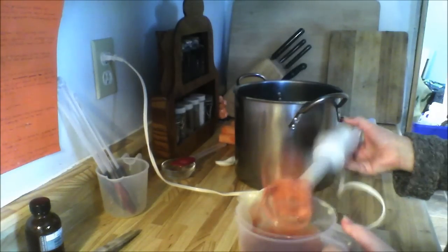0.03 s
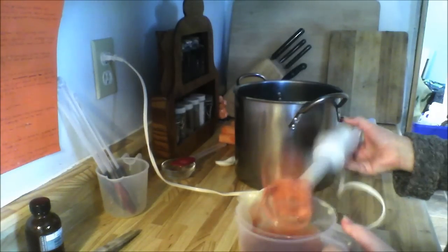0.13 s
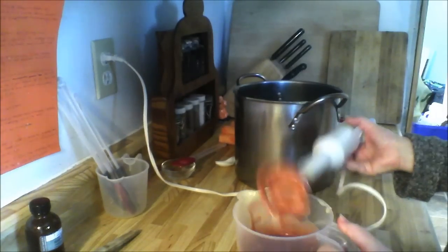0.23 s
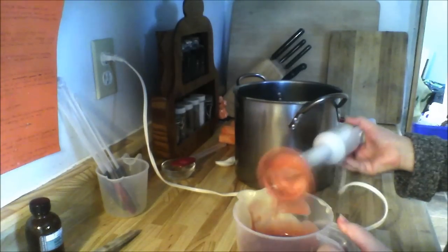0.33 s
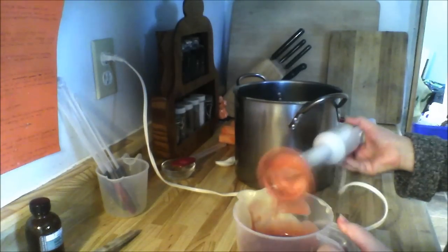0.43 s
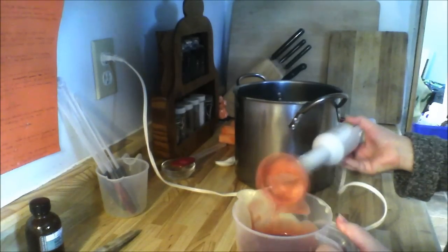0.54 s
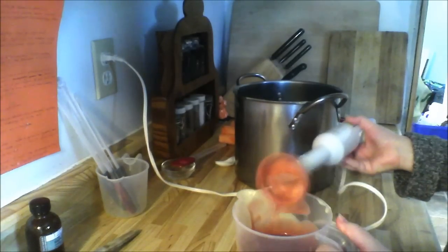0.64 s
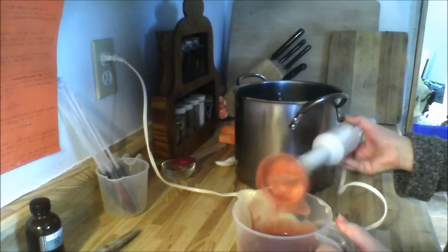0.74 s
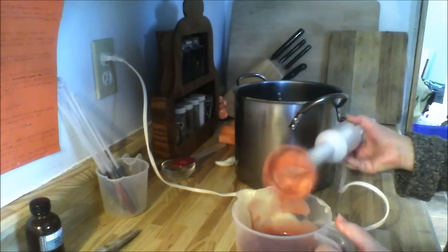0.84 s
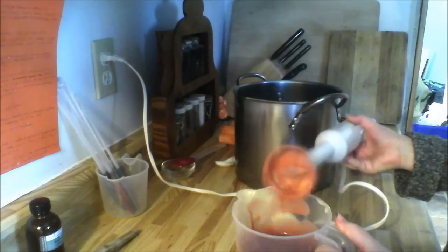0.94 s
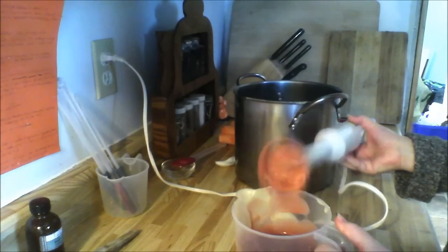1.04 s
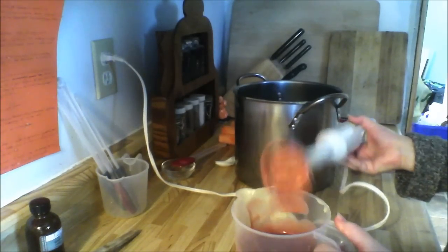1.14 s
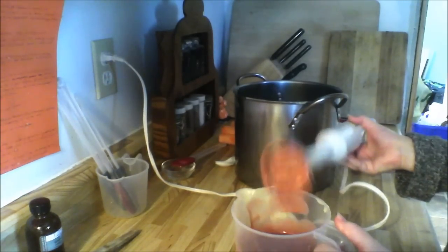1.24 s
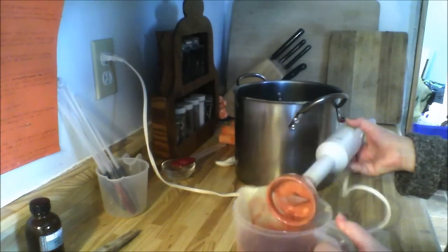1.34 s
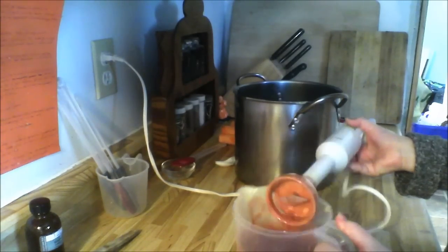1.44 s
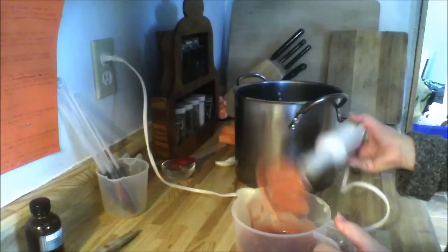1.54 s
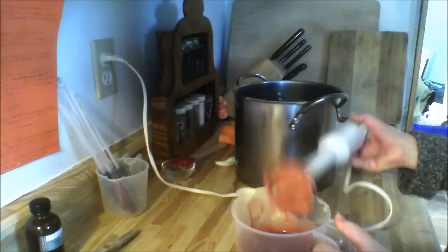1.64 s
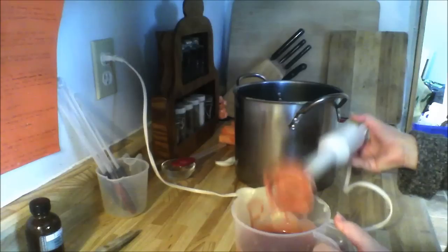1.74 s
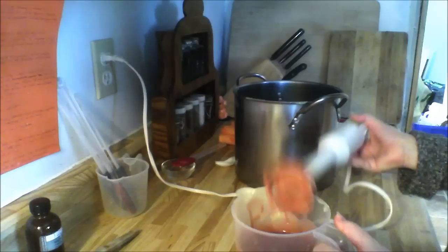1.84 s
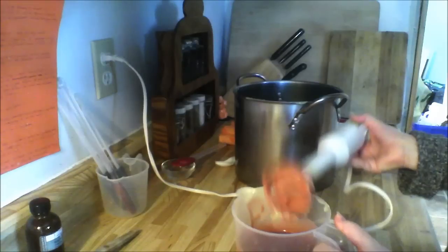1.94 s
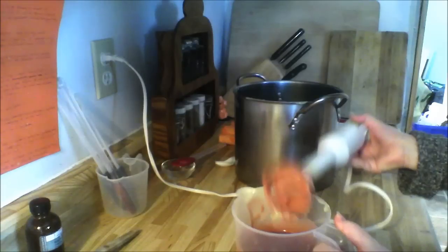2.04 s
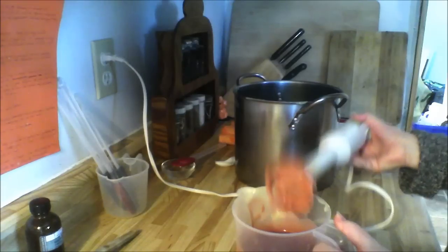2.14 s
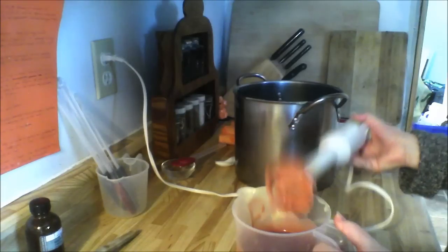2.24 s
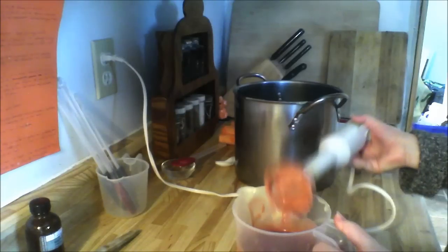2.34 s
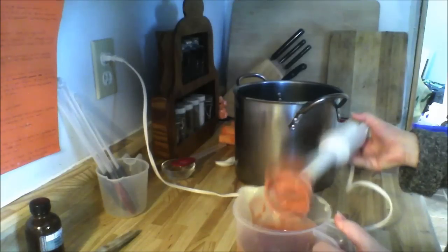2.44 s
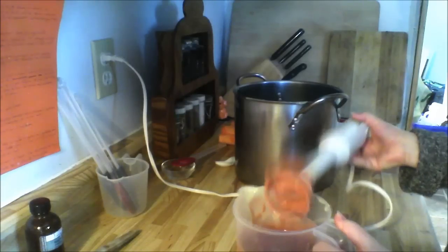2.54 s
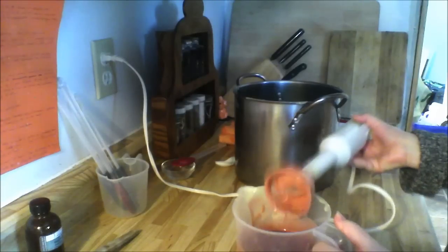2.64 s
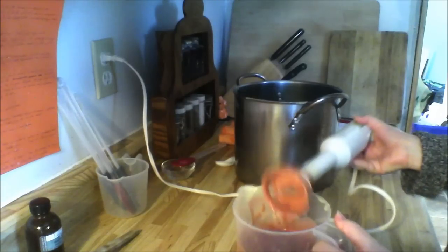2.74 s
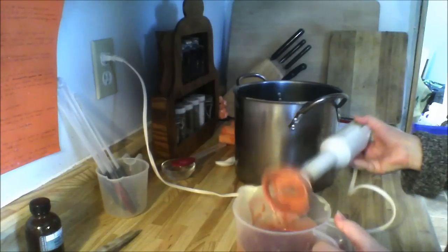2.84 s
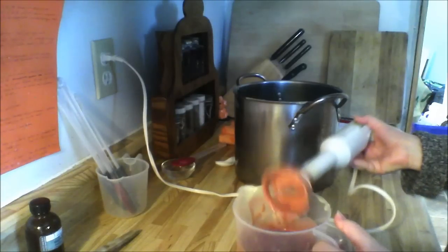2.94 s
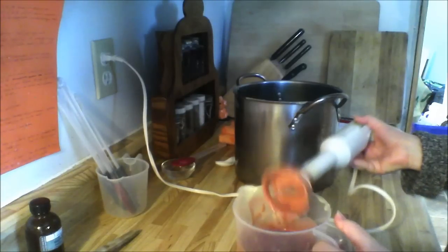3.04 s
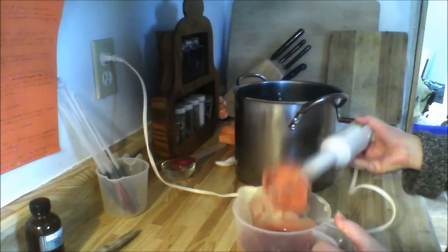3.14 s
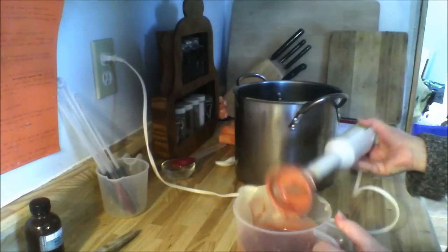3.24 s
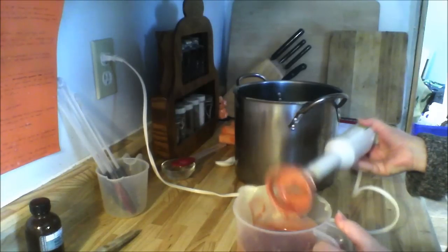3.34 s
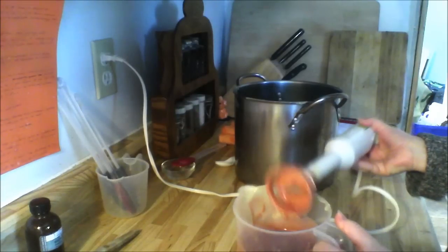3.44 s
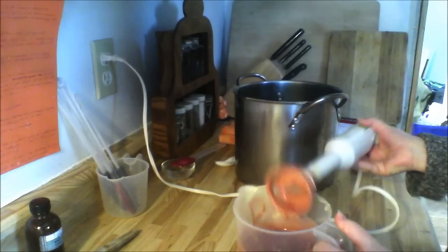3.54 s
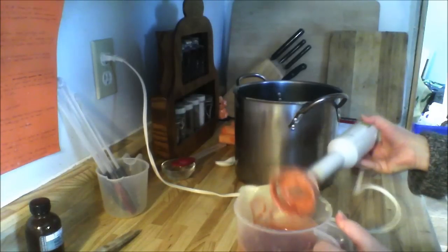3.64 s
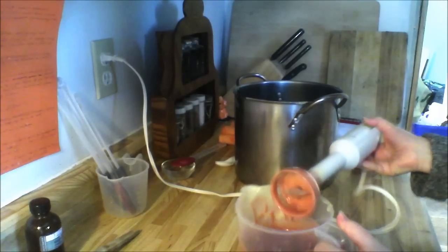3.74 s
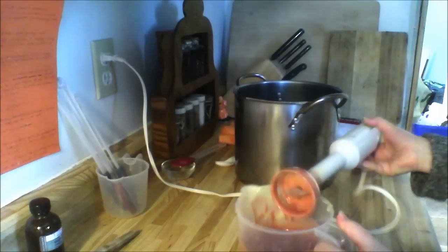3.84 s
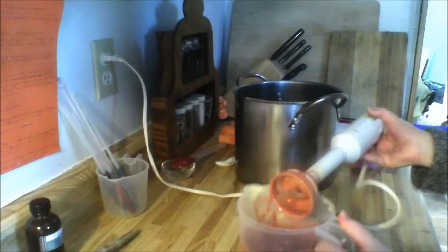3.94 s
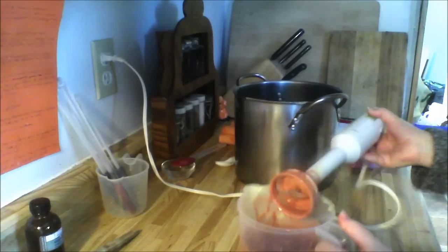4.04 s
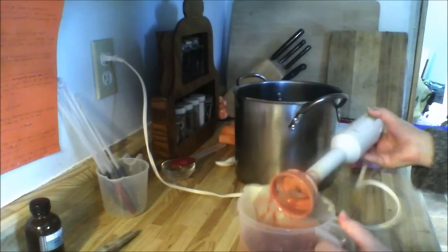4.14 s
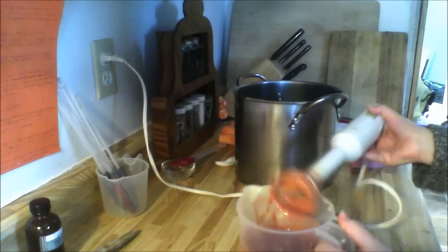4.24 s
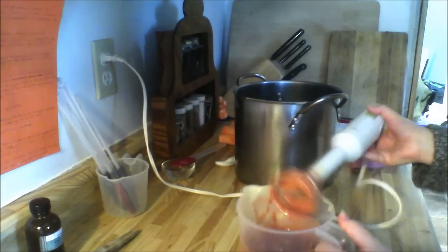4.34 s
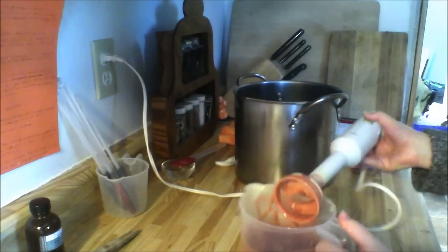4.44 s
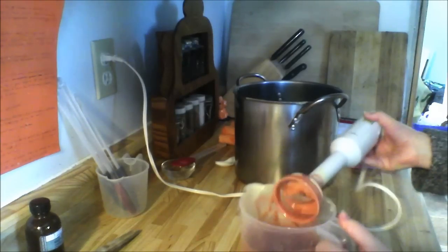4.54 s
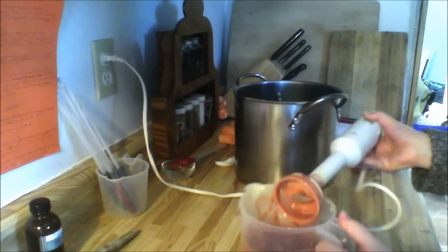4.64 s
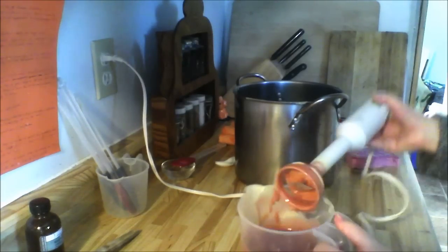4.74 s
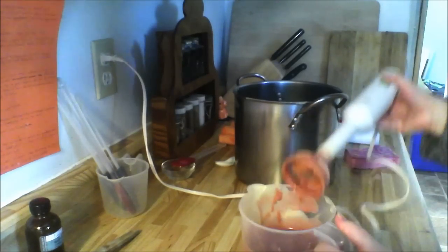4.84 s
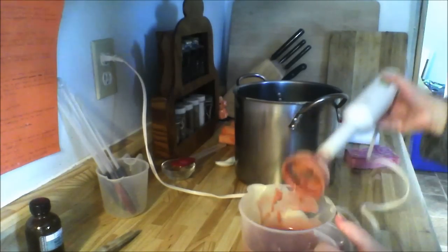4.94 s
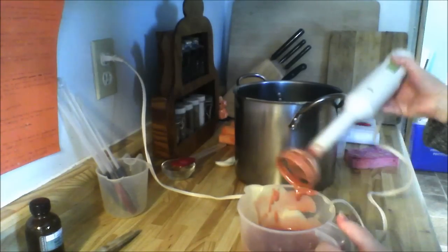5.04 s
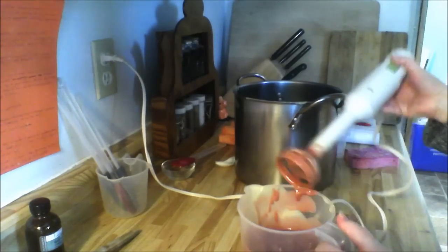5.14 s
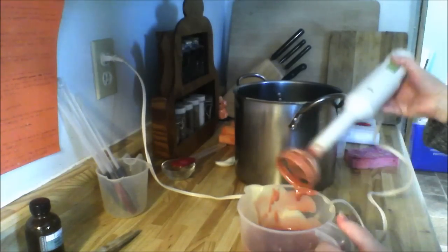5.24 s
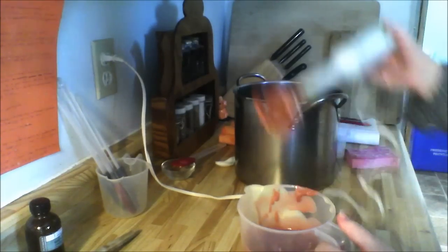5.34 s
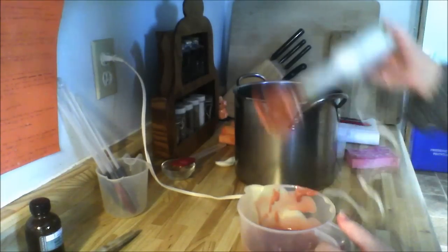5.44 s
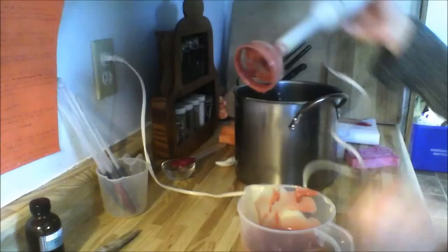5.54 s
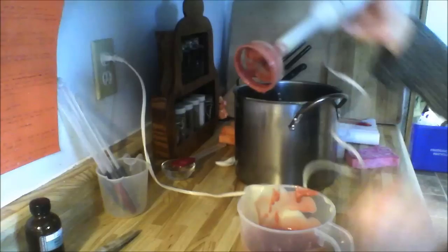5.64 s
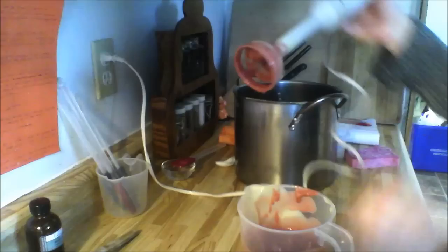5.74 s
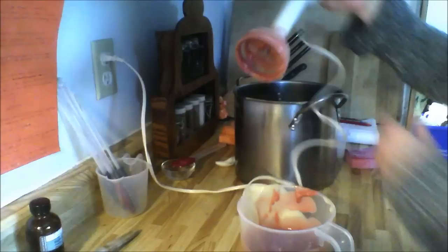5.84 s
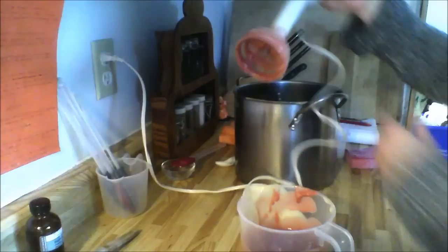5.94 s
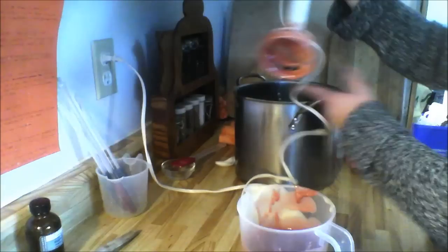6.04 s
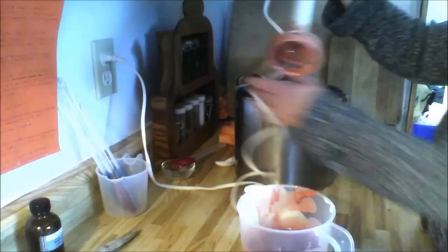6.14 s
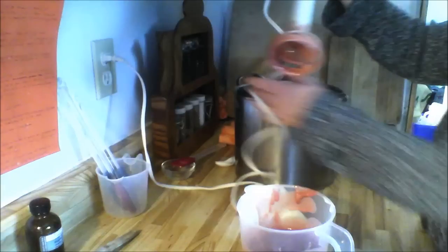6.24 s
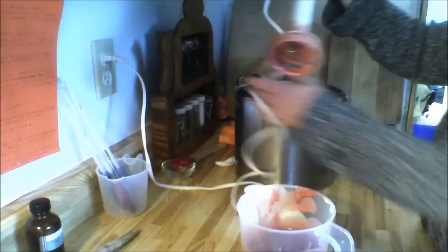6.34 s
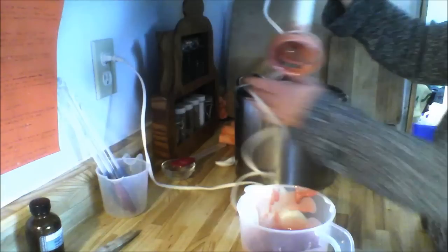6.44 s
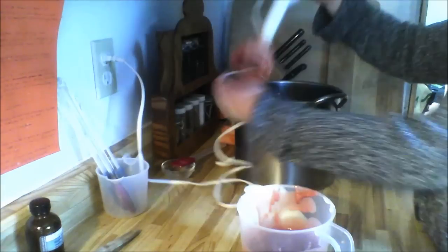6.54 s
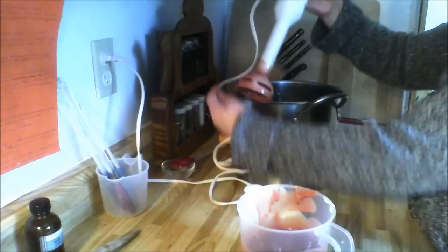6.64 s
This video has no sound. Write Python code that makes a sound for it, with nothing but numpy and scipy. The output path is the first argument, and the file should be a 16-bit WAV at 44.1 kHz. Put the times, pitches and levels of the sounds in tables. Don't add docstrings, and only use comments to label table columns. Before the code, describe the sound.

From 0 to about 4.5 seconds, a stick blender with its motor off is rapped on the rim of a plastic pitcher holding thick batter. Blows come every 0.23 to 0.25 seconds, uneven in strength, each a dry broadband crack with a short hollow ring around 130 to 400 hertz and a softer rebound about 0.05 seconds later. Around 3.3 to 3.8 seconds the rebounds thump the pitcher heavily on the bench. The last blow at 4.4 has two quick bounces. Then it falls nearly silent: small scuffs with light taps at 4.9 and 5.17, a clearer knock and brushing around 5.75, then soft cord and sleeve rubbing with faint ticks from 6.2 to 6.6. A pot hums almost inaudibly. Small room, short tails, close thin microphone with flattened peaks, dull treble and very low gated hiss.

```python
import sys
import numpy as np
from scipy import signal
from scipy.fft import rfft, irfft, next_fast_len
from scipy.io import wavfile
from scipy.ndimage import uniform_filter1d, map_coordinates

SR = 44100
rng = np.random.default_rng(int(sys.argv[2]) if len(sys.argv) > 2 else 0)


def output_pcm(signal):
    pcm = np.clip(np.atleast_2d(signal).T, -1, 1) * 32767
    wavfile.write(sys.argv[1], SR, np.round(pcm).astype(np.int16))


def invert_db(level):
    return 10 ** (np.asarray(level, dtype=float) / 20)


N = 295690
LEAD, RING = SR // 10, 12288


def unit(x):
    return x / np.sqrt(np.mean(x ** 2) + 1e-20)


def along(points, hz):
    f, v = np.transpose(points)
    return np.interp(np.log(hz + 1), np.log(f + 1), v)


def noise(spectrum, size):
    m = next_fast_len(size + 8192)
    white = rfft(rng.standard_normal(m))
    colour = invert_db(along(spectrum, np.fft.rfftfreq(m, 1 / SR)))
    return unit(irfft(white * colour, m)[:size])


def ring(modes, attack, scatter_db, phase, detune):
    hz, db, t60 = np.transpose(modes)[:, :, None]
    t = np.arange(RING) / SR
    strength, shift = rng.standard_normal((2, len(modes), 1))
    decay = invert_db(db + scatter_db * strength - 60 * t / t60)
    each = decay * np.sin(2 * np.pi * hz * (1 + detune * shift) * t + phase)
    return each.sum(0) * (1 - np.exp(-t / attack))


# frequency in Hz, t60 in seconds.
ROOM_DECAY = [(150, 0.24), (400, 0.26), (900, 0.3), (2000, 0.25), (4000, 0.22), (6000, 0.2), (8000, 0.17)]


def room(x, wet_db, size):
    burst = x[:1024] * np.exp(-np.arange(1024) / SR / 0.031)
    colour = np.sqrt(np.abs(uniform_filter1d(np.abs(rfft(burst)) ** 2, size)))
    hz, t, z = signal.stft(rng.standard_normal(RING), SR, nperseg=1024)
    decay = invert_db(-60 * t / along(ROOM_DECAY, hz)[:, None])
    tail = signal.istft(z * colour[:, None] * decay, SR, nperseg=1024)[1][:RING]
    tail = tail * (1 - np.exp(-np.arange(RING) / SR / 0.01))
    return x + invert_db(wet_db) * tail * np.linalg.norm(burst) / np.linalg.norm(tail)


# frequency in Hz, level in dB, t60 in seconds.
UPPER_MODES = [(547.8, -1.5, 0.048), (603.2, -0.5, 0.049), (766.5, 0, 0.05), (834, -2, 0.07),
               (882, -2.5, 0.027), (1021.5, -7, 0.05), (1122.5, -3, 0.052), (1223, -8.5, 0.05),
               (1560, -15, 0.05), (1700, -11, 0.061), (2000, -12, 0.04), (2357, -9.5, .035),
               (2790, -14, .035), (3405, -10.5, 0.044)]


def contacts(rows, spectrum, base, second, low_db, second_db, upper_db, crack_db, crack_rise, crack_t60,
             wet_db, low_wet_db):
    out, t = np.zeros(LEAD + N + RING), np.arange(RING) / SR
    for s, db, low, mid, top, hard in rows:
        colour = [(hz, level + hard * np.log2(max(hz / 2500, 1))) for hz, level in spectrum]
        crack = noise(colour, RING) * invert_db(crack_db - 60 * t / crack_t60) * (1 - np.exp(-t / crack_rise))
        crack += invert_db(top + upper_db) * ring(UPPER_MODES, attack=0.003, scatter_db=1.55, phase=0, detune=0.013)
        body = invert_db(low + low_db) * ring(base, attack=0.004, scatter_db=3.5, phase=np.pi, detune=0.0042)
        body += invert_db(mid + second_db) * ring(second, attack=0.0057, scatter_db=2.5, phase=np.pi / 4,
                                            detune=0.0037)
        contact = room(crack, wet_db, size=5) + room(body, low_wet_db, size=1)
        out[LEAD + round(s * SR):][:RING] += invert_db(db) * contact
    return out[LEAD:LEAD + N]


# frequency in Hz, density in dB per Hz.
RIM_CRACK = [(530, -22.5), (900, -2.5), (1220, -10), (1470, -13.5), (1800, -8.5), (2270, -9.5),
             (2870, -12.5), (3330, -10.5), (4420, -19), (6550, -20.5), (10000, -42.5), (13000, -86),
             (22000, -120)]
# frequency in Hz, level in dB, t60 in seconds.
PITCHER_LOW = [(131.8, -11, 0.097), (186.3, 3.5, 0.056), (186.8, -16.5, 0.25), (209, -27.5, 0.19),
               (248, -8, 0.11)]
# frequency in Hz, level in dB, t60 in seconds.
PITCHER_SECOND = [(368.5, 1.5, 0.099), (351.5, -19, 0.26), (373.7, -11, 0.24), (470, -7, 0.09)]
# start in seconds, crack in dB, ring in dB, hardness in dB per octave.
BLOWS = [(-.06, -7, -10.5, 2.5), (0.181, -1.5, -7, -3), (0.4278, -5, -8.5, -1.5), (0.6636, -6, -8.5, -3.5),
         (0.9042, -9.5, -9.5, 2), (1.1441, -2, -8.5, -0.6), (1.3847, -1.5, -7, 0.3), (1.6251, -3, -10, -3),
         (1.8642, -3.5, -9, -2), (2.0886, -5.5, -9.5, -1), (2.3361, -5.5, -11, -0.5),
         (2.565, -6.5, -8.5, 0.5), (2.803, -4.5, -9.5, 1), (3.0326, -10.5, -19.5, -1.2),
         (3.2612, -4, -9.5, 0), (3.5112, -3, -13, -2.3), (3.743, -3.5, -8, -2.1), (3.9767, -4.5, -9, -0.8),
         (4.2, -8, -14, -1), (4.404, -3.5, -10, 0.6)]


def blows():
    cleaner_db_per_s = 0.85
    rows = []
    for s, db, ring_db, hard in BLOWS:
        upper_db = -1 + 0.7 * (ring_db + 10.5) + cleaner_db_per_s * (s - 2)
        rows.append((s, db, ring_db - db, ring_db + 1.5 - db, upper_db - db, hard))
    return contacts(rows, RIM_CRACK, PITCHER_LOW, PITCHER_SECOND, low_db=3, second_db=1.5, upper_db=-4.5,
                    crack_db=-3.5, crack_rise=0.00059, crack_t60=0.048, wet_db=-7.5, low_wet_db=-8.5)


# frequency in Hz, level in dB, t60 in seconds.
BASE_THUD = [(133, -12, .08), (178, -2, 0.065), (203, 0, .07), (186.9, -16.5, .3), (250, -2, 0.036),
             (320, -13, 0.052)]
# start in seconds, crack in dB, thud in dB, wall modes in dB.
BOUNCES = [(-.015, -27.5, -32, -28), (0.226, -17, -15, -15), (0.4753, -14.5, -15, -17.5),
           (0.707, -17.5, -16, -25.5), (0.9524, -15, -17, -33.5), (1.1939, -18, -13.5, -19),
           (1.4396, -14, -12, -18), (1.6704, -15, -13, -19.5), (1.914, -12.5, -14.5, -22.5),
           (2.135, -16.5, -15, -16), (2.383, -16, -14.5, -32.5), (2.608, -18.5, -24, -24.5),
           (2.8529, -16.5, -18, -24), (3.0631, -29.5, -16, -39.5), (3.3086, -9.5, -2.5, -23),
           (3.5565, -7.5, -4, -20), (3.7901, -7.5, -1.5, -17), (4.0319, -10.5, -16.5, -16),
           (4.2388, -16.5, -14.5, -25), (4.4461, -16, -32, -20), (4.4807, -10, -10.5, -23.5)]


def bounces():
    rows = [(s, db, thud_db - db, wall_db - db, -1, -3.5) for s, db, thud_db, wall_db in BOUNCES]
    return contacts(rows, RIM_CRACK, BASE_THUD, PITCHER_SECOND, low_db=3.0, second_db=2.0, upper_db=-6.5,
                    crack_db=-2.5, crack_rise=0.00092, crack_t60=0.049, wet_db=-7.5, low_wet_db=-11)


# frequency in Hz, density in dB per Hz.
HISS_COLOUR = [(35, -94), (60, -41.5), (168, -4), (388, -11), (440, -1.5), (712, -16), (1110, -8.5),
               (1230, -12), (2610, -19.5), (6300, -32.5), (9000, -35), (11700, -78.5), (19800, -120)]
# time in seconds, level in dB.
HISS_LEVEL = [
    (4.7, -67.5),
    (5.048, -72),
    (5.24, -73.5),
    (5.61, -68),
    (6.15, -70),
    (6.39, -68),
    (6.57, -69),
    (6.7, -71),
]


def floor():
    return noise(HISS_COLOUR, N) * invert_db(np.interp(np.arange(N) / SR, *np.transpose(HISS_LEVEL)))


# frequency in Hz, level in dB, t60 in seconds.
POT_MODES = [(888, -69, 5)]


def pot():
    push, t = np.zeros(N), np.arange(2 * SR) / SR
    for s, db, *_ in BLOWS[1:] + BOUNCES[1:]:
        push[round(s * SR)] = invert_db(db)
    hum = sum(invert_db(db - 60 * t / t60) * np.sin(2 * np.pi * hz * t) for hz, db, t60 in POT_MODES)
    return signal.fftconvolve(push, hum)[:N]


def resonate(x, hz, width_hz):
    return unit(signal.lfilter(*signal.iirpeak(hz, hz / width_hz, SR), x))


def strokes(rows, friction, width):
    out = np.zeros(N)
    for s, rise, fall, db, hz in rows:
        on = np.arange(round((s - rise) * SR), round((s + fall) * SR))
        away = np.interp(on / SR, [s - rise, s, s + fall], [1, 0, 1])
        out[on] += resonate(friction[on], hz, width * hz) * invert_db(db - 36 * away ** 1.5)
    return out


# frequency in Hz, density in dB per Hz.
DRAG_COLOUR = [(90, -29.5), (140, 2), (700, -0.5), (1000, -30)]
# frequency in Hz, density in dB per Hz.
RUB_COLOUR = [(400, -14.5), (700, -2), (3500, -7), (4800, -21.5), (7000, -47.5)]
# peak in seconds, rise in seconds, fall in seconds, level in dB, centre in Hz.
DRAGS = [(1.085, .07, 0.42, -60.5, 301.6), (4.897, 0.018, 0.084, -42.5, 190),
         (5.172, 0.018, 0.08, -41.5, 320), (5.4, .03, .08, -65, 160), (5.445, 0.089, .035, -51, 176),
         (5.42, 0.11, 0.15, -65, 447), (5.735, 0.016, 0.071, -55, 427), (5.81, 0.069, 0.06, -47, 427),
         (6.066, .06, 0.03, -75, 437), (6.126, .07, .12, -74, 440), (6.36, .025, .12, -55, 186),
         (6.386, .07, .1, -44.5, 420), (6.46, .1, .06, -47, 330), (6.55, 0.044, 0.03, -48, 416)]
# peak in seconds, rise in seconds, fall in seconds, level in dB, centre in Hz.
RUBS = [(1.082, 0.054, 0.3, -53.5, 1410), (4.893, 0.017, .1, -49, 2480), (5.171, .016, 0.063, -49, 2500),
        (5.766, 0.048, 0.039, -41, 2000), (6.19, .1, .03, -67.5, 1640), (6.326, 0.026, 0.12, -51, 1430),
        (6.385, 0.078, 0.12, -51, 1420), (6.46, 0.11, 0.094, -56.5, 1410),
        (6.523, 0.005, 0.059, -43.5, 1270)]
# peak in seconds, rise in seconds, fall in seconds, level in dB, centre in Hz.
BRUSHES = [(4.9, 0.011, 0.094, -52, 2030), (5.42, 0.092, 0.1, -61.5, 880), (5.785, 0.024, .12, -53, 1050),
           (5.79, 0.036, 0.11, -50, 1680), (6.1, .1, 0.13, -71, 453)]


def scuffs():
    catches = map_coordinates(rng.standard_normal(1000), [np.arange(N) / SR * 110])
    drag = noise(DRAG_COLOUR, N)
    rub = unit(invert_db(4.5 * catches) * noise(RUB_COLOUR, N))
    return strokes(DRAGS, drag, width=0.3) + strokes(RUBS, rub, width=0.51) + strokes(BRUSHES, rub, width=0.065)


# frequency in Hz, density in dB per Hz.
KNOCK_CRACK = [(410, -47), (700, -48), (1040, 3), (1490, -11.5), (1660, -2.5), (2320, -5), (3060, -16),
               (3670, -9), (6330, -18.5), (9000, -48), (11700, -91), (19800, -120)]
# frequency in Hz, level in dB, t60 in seconds.
HANDLE_MODES = [(272, -4.5, 0.062), (432, 16.5, 0.024), (504, -8.5, 0.054)]
# start in seconds, crack in dB, low modes in dB over it,
# handle modes in dB over it, hardness in dB per octave.
KNOCKS = [(4.8897, -37, -6, -19, -9), (4.969, -61, 10, -3, 1), (5.0104, -72, 9, -5, -2),
          (5.166, -36, -16, -8, -1), (5.7288, -27, -22, -2, 2), (5.7626, -26.5, -36, -9, 2),
          (6.051, -67, -10, 6, -2), (6.203, -42, -25, -17, -7.5), (6.321, -43.5, -19, -30, -7.5),
          (6.3527, -41.5, -7.5, -11, -6.5), (6.389, -41, -24, 1, -3), (6.5239, -40.5, -22, -21, -2),
          (6.5514, -41.5, -29, -27, -8)]


def knocks():
    rows = [(s, db, low, mid, -17.5 - 4.3 * hard, hard) for s, db, low, mid, hard in KNOCKS]
    return contacts(rows, KNOCK_CRACK, PITCHER_LOW, HANDLE_MODES, low_db=3.5, second_db=3.0, upper_db=-20,
                    crack_db=-5.5, crack_rise=0.0003, crack_t60=0.083, wet_db=-8, low_wet_db=-4.5)


# frequency in Hz, threshold in dB over the knee.
GATE_KNEE = [(200, -2.5), (1000, -5), (3000, -11.5), (8000, -14)]


def gate(x, knee_db, soft_db, depth_db):
    hz, t, z = signal.stft(x, SR, nperseg=512, noverlap=384)
    power = uniform_filter1d(uniform_filter1d(np.abs(z) ** 2, size=7, axis=0), size=5, axis=1)
    over = 10 * np.log10(np.abs(power) + 1e-16) - knee_db - along(GATE_KNEE, hz)[:, None]
    shut = 1 / (1.0 + np.exp(np.clip(over / soft_db, -30, 30)))
    return signal.istft(z * invert_db(-depth_db * shut), SR, nperseg=512, noverlap=384)[1][:N]


def scene():
    impacts = blows() + bounces() + knocks()
    mix = gate(impacts, knee_db=-69, soft_db=0.5, depth_db=12.0) + floor() + pot() + scuffs()
    return mix[None]


# frequency in Hz, gain in dB.
MIC_RESPONSE = [(40, -44.5), (90, -17.5), (130, 0.5), (6500, -1), (8500, -12.5), (10000, -56)]


def microphone(x):
    m = 8192
    cepstrum = irfft(np.log(invert_db(along(MIC_RESPONSE, np.fft.rfftfreq(m, 1 / SR))) + 1e-6), m)
    cepstrum[1:m // 2] *= 2
    cepstrum[m // 2 + 1:] = 0
    response = irfft(np.exp(rfft(cepstrum)), m)[:m // 2]
    return signal.fftconvolve(x, response)[:len(x)]


def top_cut(x):
    return signal.sosfilt(signal.butter(12, 16580, fs=SR, output="sos"), x)


def record(dry):
    x = microphone(dry[0])
    x = x / (1 + np.abs(x) ** 20) ** (1 / 20)
    return top_cut(x[None])


dry = scene()
out = record(dry)
output_pcm(out)
```